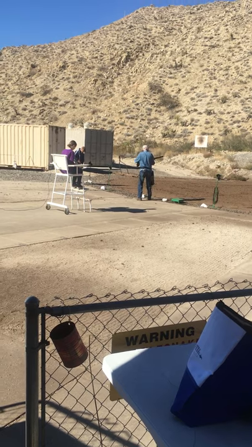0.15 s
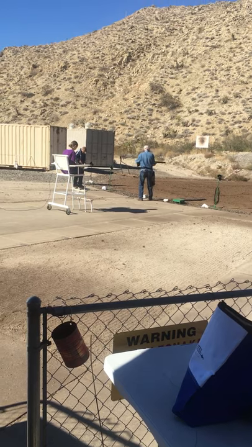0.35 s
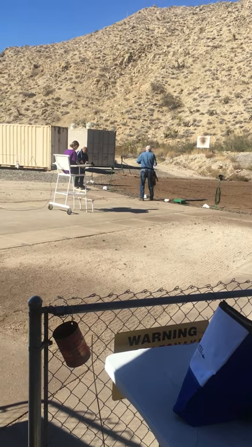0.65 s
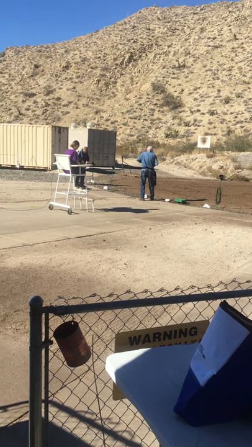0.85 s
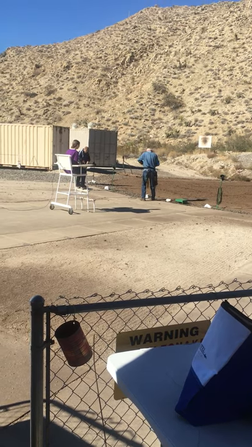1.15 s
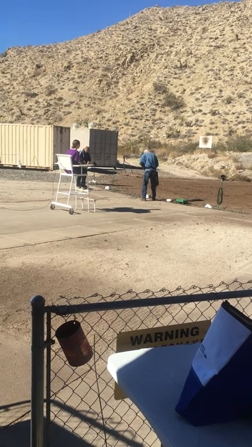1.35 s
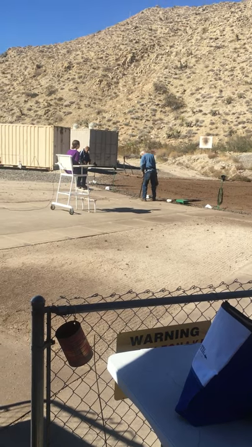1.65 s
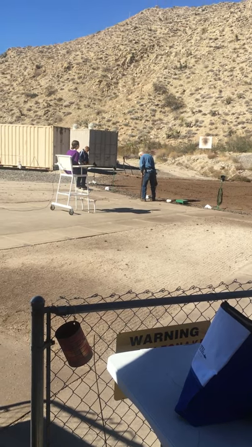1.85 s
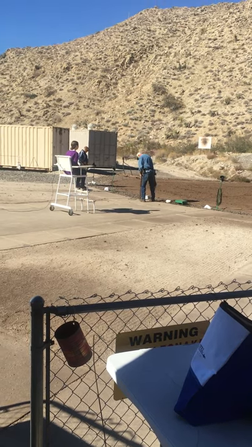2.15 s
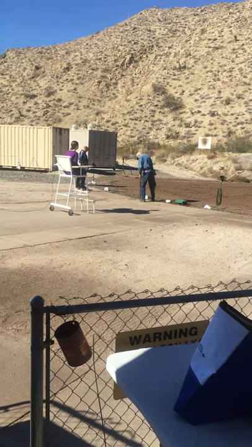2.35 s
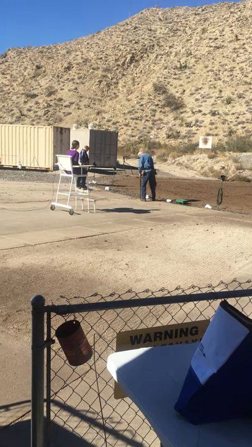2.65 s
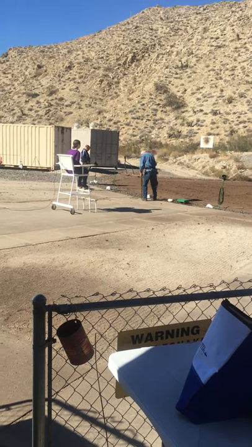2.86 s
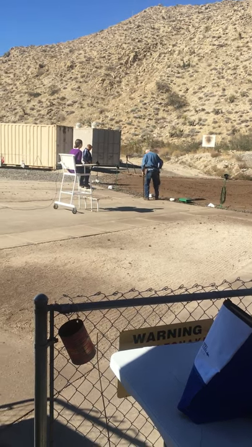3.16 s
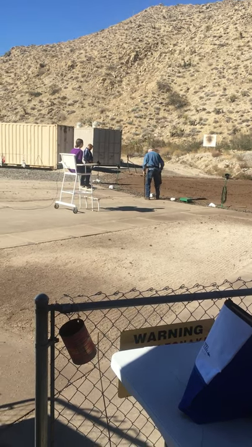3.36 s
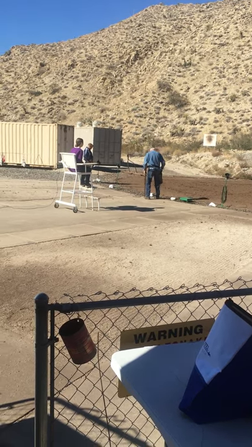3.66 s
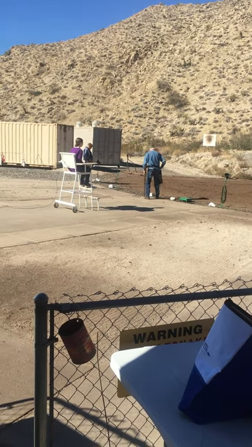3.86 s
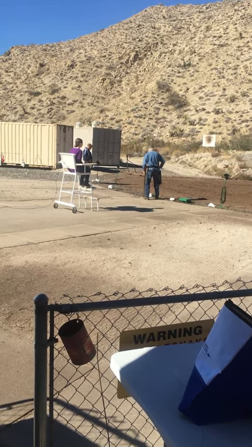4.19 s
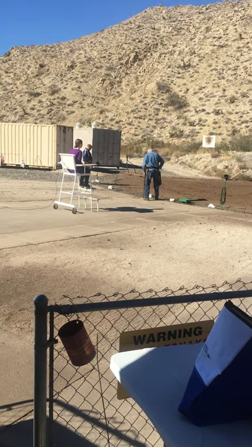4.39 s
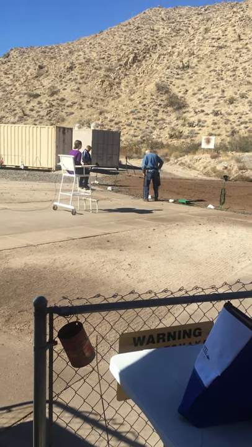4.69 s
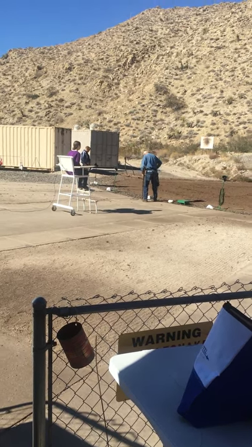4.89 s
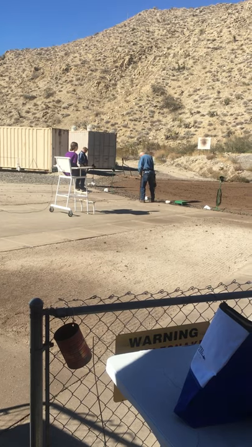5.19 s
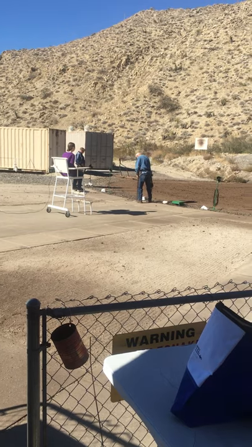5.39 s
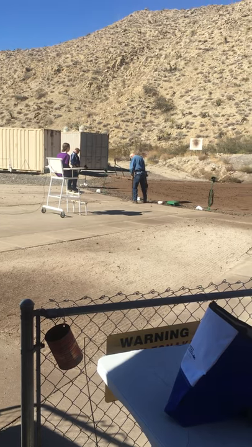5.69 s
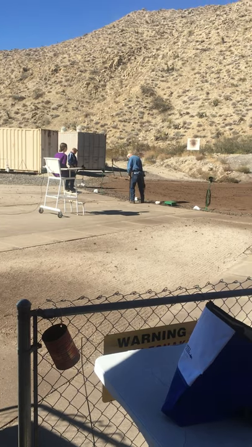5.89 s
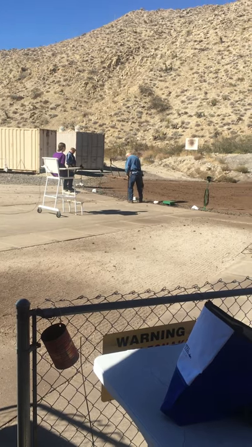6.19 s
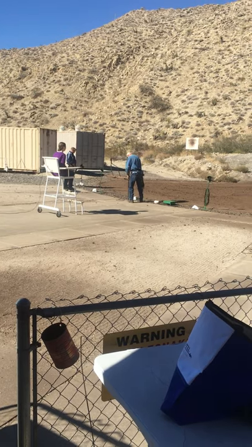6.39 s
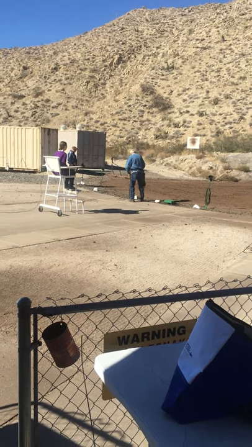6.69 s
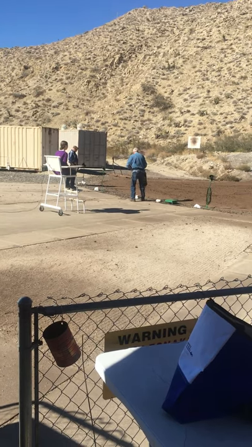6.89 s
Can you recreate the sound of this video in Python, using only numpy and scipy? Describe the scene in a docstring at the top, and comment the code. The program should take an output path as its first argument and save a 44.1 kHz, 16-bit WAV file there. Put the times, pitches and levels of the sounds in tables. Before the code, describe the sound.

A dull rolling echo opens the scene over quiet outdoor air. A bright, cracking shotgun blast is followed a second later by a deeper one, clays breaking just after each. The hill returns swelling noise. In the lull, steel clacks and brass shells clink faintly; a last bassy shot follows, with slapping echoes. Distant phone pickup, peaks squashed.

```python
"""The echo of an earlier shot is already rolling back from a rocky hillside, over a low steady rumble.
Then shotguns fire at clay targets on an open desert range, some twenty metres from a phone behind a fence.
Each blast is a shock front plus noise scattered off ground, fence and sheds; the hill answers with noise swells.
Clays crack as noise bursts; a gun is opened and its shells clink as clicks with ringing tones.
The phone squashes the blasts."""
import sys
import numpy as np
from scipy import signal
from scipy.fft import rfft, irfft, next_fast_len
from scipy.io import wavfile

SR = 44100
rng = np.random.default_rng(int(sys.argv[2]) if len(sys.argv) > 2 else 0)


def persist_wave(psi):
    """Save psi, clipped to +-1, as 16-bit WAV."""
    counts = np.round(np.clip(psi, -1, 1) * 32767).astype(np.int16)
    wavfile.write(sys.argv[1], SR, np.atleast_2d(counts).T)


N = 310464  # samples in the scene, 7.04 s
T = np.arange(92160) / SR  # time inside one event, s
BANDS_HZ = 28 * 2 ** (np.arange(19) / 2)  # centres of half-octave bands

# In every table t60_s is the time in which a sound falls by 60 dB.
# Open-air background, relative spectrum: pitch_hz, level_db (per Hz)
AIR_SPECTRUM = [(20, -19), (45, -1), (95, 4), (135, -4), (300, -6.5), (1050, -14), (1750, -32), (2400, -35),
                (3100, -45), (5000, -44), (10000, -49), (16000, -53)]
AIR_DB, RUMBLE_HZ, RUMBLE_DB = -49, 66, -50.5  # level of the open air; pitch and level of the rumble

# Handling of guns and shells: start_s, level_db, t60_s, action_ring_db, shell_ring_db (rings relative to level)
CLICKS = [(.651, -60, .07, -16, -18), (.717, -59, .05, -12, -16), (1.136, -64, .05, -5, -20),
          (3.4965, -47, .045, 7, -12), (3.596, -63, .3, -18, -22), (3.631, -62, .28, -17, -16),
          (3.772, -57, .04, -20, -18), (3.7795, -51, .1, -18, -8), (3.812, -50, .025, -20, 0),
          (3.8355, -54, .035, -20, 2), (3.953, -67, .15, -8, -20), (4.885, -67, .15, -2, -6),
          (5.165, -71, .09, -8, -4)]
# Relative spectrum of a contact: pitch_hz, level_db (per Hz)
CLICK_SPECTRUM = [(1000, -10), (2300, 0), (5000, 0), (7500, -4), (11000, -15), (16000, -18)]
# Ringing tones of the gun's steel action: pitch_hz, level_db (relative), t60_s
ACTION_TONES = [(1631, -12, .1), (2130, -5, .05), (2277, 0, .059), (3957, -14, .08), (4500, -1, .025),
                (5712, -18, .12), (8188, -20, .08)]
# Ringing tones of a shell's brass: pitch_hz, level_db (relative), t60_s
SHELL_TONES = [(5130, -8, .07), (5216, -5, .11), (5480, -6, .07), (5750, -9, .06), (6202, -12, .1),
               (6783, -11, .1), (7580, -6, .07), (8059, -16, .1)]

# Short metallic pings in the wake of a shot: start_s, pitch_hz, level_db, t60_s
PINGS = [(1.355, 3250, -37, .15), (1.405, 5800, -45, .15), (1.522, 3200, -45, .2)]

# Sharp cracks as clays break: start_s, level_db, t60_s, treble_db (tilts the spectrum before its power is evened)
CRACKS = [(1.279, -24, .17, 13), (1.2980, -6.5, .012, 9), (1.309, -26, .11, 5), (2.3584, -6.5, .012, -6),
          (2.396, -24.5, .17, -4), (2.412, -27, .08, -3), (2.433, -31, .03, 8), (2.4832, -26, .04, -10),
          (5.5542, -27, .085, -4), (5.5822, -33, .035, 1), (5.675, -47, .2, 2)]
# Relative spectrum of a breaking clay: pitch_hz, level_db (per Hz)
CRACK_SPECTRUM = [(400, -22), (1200, -7), (2150, 1), (3000, -10), (4600, -7), (7000, -18), (16000, -27)]

# Single rock faces that slap back out of the roll, and at 2.483 s a clay that breaks with a dull thud: start_s,
# level_db, hollow_ring_db
SLAPS = [(.378, -32, -40), (.432, -39, -26), (2.483, -24, -45), (2.908, -23, -40), (5.905, -25, -45),
         (5.941, -22, -36), (6.003, -25, -29), (6.043, -18, -27), (6.557, -33, -30)]
# Relative spectrum of the hillside's answer: pitch_hz, level_db (per Hz)
ECHO_SPECTRUM = [(40, -23), (100, -11), (190, -10), (290, 0), (470, -3), (620, 0), (900, -4), (1200, -13.5),
                 (2100, -22.5), (3000, -33.5), (4900, -45), (6200, -43.5), (10000, -56), (15000, -64)]
# Slopes that return a shot as a swell (bare foot, main face, two far ridges):
# delay_s, half_width_s, level_db (relative), treble_db (relative to that level)
SLOPES = [(.47, .15, -9.5, 10.5), (.645, .142, 0, -1.5), (1.175, .26, -13.8, -4.5), (1.655, .1, -14, -7)]
FOOT_S, FOOT_EDGE_S = .398, .012  # the hill's answer sets in abruptly at this delay
FLAT_DB, FLAT_TREBLE_DB, FLAT_RISE_S = -19, 3, .2  # until then only the flat scrub answers
FAR_S = .94  # slopes beyond this delay are the far ridges

# Shots; boom is the sound below about 1 kHz, crack the sound above; the first is fired before the start:
# start_s, boom_db, crack_db, bass_edge_hz, build_up_s, tail_boom_db, tail_crack_db,
# hill_boom_db, hill_crack_db, far_ridges_db (extra)
SHOTS = [(-0.68, -11, -11, 90, .005, -22, -22, -29, -28, 5.5),
         (1.2015, -13, -7.2, 105, .009, -21.5, -15.3, -37, -24.5, 0),
         (2.2562, -8.7, -10.3, 55, .0025, -17.5, -17.7, -28, -27, 4),
         (5.4082, -7.9, -8.3, 46, .002, -22.5, -25, -28, -31, 0)]
# Relative spectrum of the blast among the near objects: pitch_hz, level_db (per Hz)
BLAST_SPECTRUM = [(30, -21), (60, -7), (100, 1), (170, -2.5), (250, -2.5), (360, 0), (620, .5), (750, -3),
                  (980, -1), (1500, -10.5), (2300, -17), (4800, -25.5), (6500, -24), (10500, -33),
                  (16000, -36)]
# Relative spectrum of the blast's tail over the field: pitch_hz, level_db (per Hz)
TAIL_SPECTRUM = [(40, -14), (110, -3), (220, 0), (450, -3), (900, -5), (1500, -11), (3000, -17),
                 (6000, -20), (9000, -25), (16000, -32)]
# Tones of near objects that the blast sets ringing: pitch_hz, level_db (relative), t60_s
FENCE_TONES = [(104, -24, .25), (225, -23, .2), (355, -19, .17), (500, -24, .15), (615, -16, .16),
               (895, -21, .15), (1105, -23, .13), (1435, -28, .12)]


def undb(db):
    """Turn decibels into gain."""
    return 10 ** (np.asarray(db) / 20)


def add(out, start_s, sound):
    """Mix a sound in at its start time, dropping what falls outside the scene."""
    start = int(round(start_s * SR))
    part = sound[max(-start, 0):len(out) - start]
    out[max(start, 0):max(start, 0) + len(part)] += part


def colour(spectrum, hz):
    """Read the gain of a spectrum table at these frequencies."""
    table_hz, table_db = np.transpose(spectrum)
    return undb(np.interp(np.log(hz + 1), np.log(table_hz), table_db))


def shaped(noise, spectrum):
    """Give white noise a spectrum while keeping its power."""
    gain = colour(spectrum, np.fft.rfftfreq(len(noise), 1 / SR))
    gain = gain / np.sqrt(np.mean(gain ** 2))
    return irfft(rfft(noise) * gain, len(noise))


def split(sound):
    """Split a sound into overlapping half-octave bands that add up to it again."""
    log_hz = np.log(np.fft.rfftfreq(len(sound), 1 / SR) + 1)
    place = np.interp(log_hz, np.log(BANDS_HZ), np.arange(len(BANDS_HZ)))
    spectrum = rfft(sound)
    return [irfft(spectrum * np.maximum(1 - abs(place - k), 0), len(sound)) for k in range(len(BANDS_HZ))]


def treble(hz, edge_hz=1150):
    """Share 0-1 with which a frequency counts as treble; one half at the edge."""
    return 1 / (1 + (edge_hz / hz) ** np.pi)


def waver(size, per_s):
    """Random levels joined by straight lines."""
    return np.interp(np.arange(size) / SR * per_s, np.arange(400), rng.standard_normal(400))


def scatter(spread_db):
    """A dense train of reflections whose strength jumps every millisecond, rms 1."""
    sizes = undb(spread_db * rng.standard_normal(len(T)))
    sizes = np.repeat(sizes, SR // 1000)[:len(T)]
    reflections = rng.standard_normal(len(T)) * sizes
    return reflections / reflections.std()


def ring(tones, detune):
    """Struck objects sound as fading sine tones, slightly off pitch on every blow."""
    t = T[:SR // 2]
    total = np.zeros(len(T))
    for hz, db, t60_s in tones:
        pitch_hz = hz * (1 + detune * rng.standard_normal())
        total[:len(t)] += undb(db - 60 * t / t60_s) * np.sin(2 * np.pi * pitch_hz * t)
    return total


def fade(t60_s):
    """Exponential decay, held at a negligible level in the end."""
    return np.exp(-np.minimum(np.log(1000) * T / t60_s, 10 * np.pi))


def rise(time_s):
    """Smooth onset from 0 towards 1."""
    return 1 - np.exp(-T / time_s)


def open_air(flicker_db=1.2):
    """Coloured noise whose bands waver in level independently."""
    noise = rng.standard_normal(next_fast_len(N, real=True))
    bands = split(shaped(noise, AIR_SPECTRUM))
    return undb(AIR_DB) * sum(band[:N] * undb(flicker_db * waver(N, per_s=7)) for band in bands)


def rumble(width_hz=22):
    """A low steady rumble: noise passed through a narrow band."""
    edges_hz = [RUMBLE_HZ - width_hz / 2, RUMBLE_HZ + width_hz / 2]
    band = signal.butter(2, edges_hz, "band", fs=SR, output="sos")
    noise = signal.sosfilt(band, rng.standard_normal(N))
    return undb(RUMBLE_DB) * noise / noise.std()


def click(db, t60_s, action_db, shell_db, yard_db=-19, yard_t60_s=.25):
    """A contact that rings the steel action and a shell's brass, with a faint answer from the yard."""
    contact = shaped(scatter(3.0), CLICK_SPECTRUM) * (fade(t60_s) + undb(yard_db) * fade(yard_t60_s))
    action = undb(action_db) * ring(ACTION_TONES, detune=.005)
    shell = undb(shell_db) * ring(SHELL_TONES, detune=.004)
    return undb(db) * (contact + action + shell)


def ping(hz, db, t60_s):
    """A small piece of metal rings once, as one fading tone."""
    return ring([(hz, db, t60_s)], detune=.002) * rise(.002)


def crack(db, t60_s, treble_db):
    """A clay breaks in a brittle burst of splinters: uneven noise that starts fast and fades."""
    spectrum = [(hz, level_db + treble_db * treble(hz, edge_hz=3500)) for hz, level_db in CRACK_SPECTRUM]
    return undb(db) * shaped(scatter(2.5), spectrum) * fade(t60_s) * rise(.0006)


def slap(db, hollow_db, hollow_hz=332, t60_s=.05, hollow_t60_s=.13, dull_hz=2000):
    """A rock face returns one dull echo with a hollow note in it; a clay that breaks dully sounds the same way."""
    burst = undb(db) * shaped(scatter(1.5), ECHO_SPECTRUM) * fade(t60_s)
    note = undb(hollow_db) * ring([(hollow_hz, 0, hollow_t60_s)], detune=.015)
    dull = signal.butter(2, dull_hz, fs=SR, output="sos")
    return signal.sosfilt(dull, (burst + note) * rise(.0015))


def slope_echo(far_db):
    """Power that the land returns at each delay, in the boom and in the treble."""
    on_hill = (1 + np.tanh((T - FOOT_S) / FOOT_EDGE_S)) / 2
    flat = undb(FLAT_DB) * np.minimum(T / FLAT_RISE_S, 1) ** 2
    low = flat ** 2 * (1 - on_hill)
    high = low * undb(FLAT_TREBLE_DB) ** 2
    for delay_s, width_s, db, treble_db in SLOPES:
        peak = undb(db + far_db * (delay_s > FAR_S))
        swell = on_hill * (peak * np.exp(-((T - delay_s) / width_s) ** 2)) ** 2
        low = low + swell
        high = high + swell * undb(treble_db) ** 2
    return low, high


def hillside(boom_db, crack_db, far_db, air_db_per_khz_s=4.1, middle_s=.61, patchy_db=1.3):
    """Countless rocks return the blast; the longer the path, the more treble the air takes."""
    low, high = slope_echo(far_db)
    out = 0
    for hz, band in zip(BANDS_HZ, split(shaped(scatter(2.4), ECHO_SPECTRUM))):
        share = treble(hz)
        swell = np.sqrt(low ** (1 - share) * high ** share)
        # air loss counts from the middle of the echo, so earlier returns are brighter
        loss_db = air_db_per_khz_s * hz / 1000 * (np.maximum(T, FOOT_S) - middle_s)
        patches_db = patchy_db * waver(len(T), per_s=28)
        level_db = boom_db + share * (crack_db - boom_db) - loss_db + patches_db
        out = out + band * swell * undb(level_db)
    return out


def muzzle(push_s=.0005, bounce_s=.0013, bounce=.7):
    """Shock front with its suction phase, and its bounce off the ground."""
    wave = (1 - T / push_s) * np.exp(-T / push_s)
    return wave + bounce * np.interp(T - bounce_s, T, wave, left=0)


def blast(boom_db, crack_db, bass_hz, build_s, tail_boom_db, tail_crack_db, hold_s=.02, near_t60_s=.2,
          mesh_s=.012, mesh_width_s=.004, mesh_db=-1, low_t60_s=.95, high_t60_s=.56, front_db=7, ring_db=7):
    """The shock, its dense scatter off fence and sheds, and a longer, uneven tail over the field."""
    front = undb(front_db) * muzzle() * np.exp(-build_s / .008)  # a blast that builds slowly has a weak front
    ringing = undb(ring_db) * ring(FENCE_TONES, detune=.008) * rise(build_s)
    out = undb(boom_db) * (front + ringing)
    build = np.minimum(.3 + T / build_s, 1)
    # the scatter stays full for hold_s, then fades
    held_fade = np.minimum(fade(near_t60_s) * np.exp(np.log(1000) * hold_s / near_t60_s), 1)
    # the wire mesh throws back a flash of treble a few milliseconds after the front
    flash = undb(mesh_db) * np.exp(-((T - mesh_s) / mesh_width_s) ** 2)
    near_bands = split(shaped(scatter(1.5), BLAST_SPECTRUM))
    tail_bands = split(shaped(scatter(3.0), TAIL_SPECTRUM))
    for hz, near, tail in zip(BANDS_HZ, near_bands, tail_bands):
        share = treble(hz)
        near_gain = undb(boom_db + share * (crack_db - boom_db))
        mesh = 1 + flash * treble(hz, edge_hz=4500)
        out = out + near * build * held_fade * mesh * near_gain
        tail_t60_s = low_t60_s + (high_t60_s - low_t60_s) * treble(hz, edge_hz=2800)
        tail_db = tail_boom_db + share * (tail_crack_db - tail_boom_db) + 1.6 * waver(len(T), per_s=40)
        out = out + tail * rise(.025) * fade(tail_t60_s) * undb(tail_db)
    return signal.sosfilt(signal.butter(2, bass_hz, "high", fs=SR, output="sos"), out)


def scene():
    """Shots with their echoes, breaking clays and gun handling in the open air."""
    out = open_air() + rumble()
    for table, source in ((CLICKS, click), (PINGS, ping), (CRACKS, crack), (SLAPS, slap)):
        for start_s, *settings in table:
            add(out, start_s, source(*settings))
    for start_s, *near, hill_boom_db, hill_crack_db, far_db in SHOTS:
        add(out, start_s, blast(*near) + hillside(hill_boom_db, hill_crack_db, far_db))
    return out[None]


def record(dry, ceiling=.72, top_hz=16000):
    """The phone rounds off the peaks of the blasts and cuts the top."""
    squashed = dry / (1 + (dry / ceiling) ** 4) ** (1 / 4)
    top_cut = signal.ellip(10, .2, 70, top_hz, fs=SR, output="sos")
    return signal.sosfilt(top_cut, squashed)


dry = scene()
out = record(dry)
persist_wave(out)
```